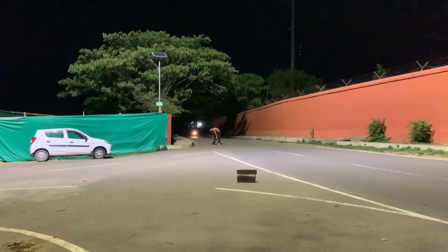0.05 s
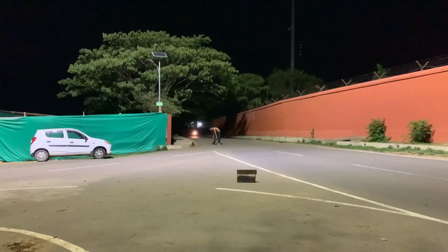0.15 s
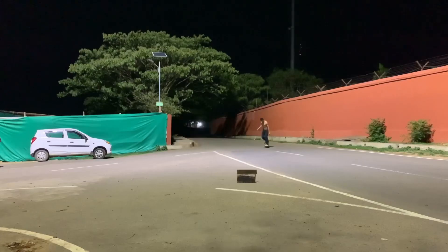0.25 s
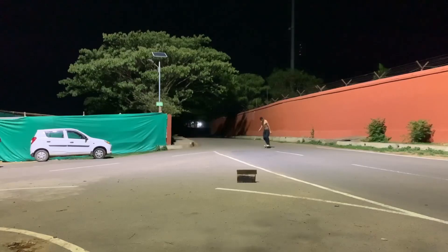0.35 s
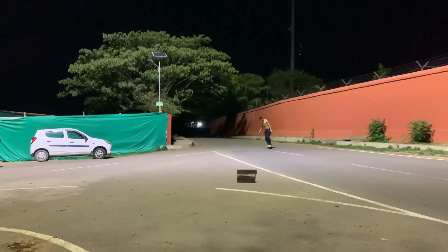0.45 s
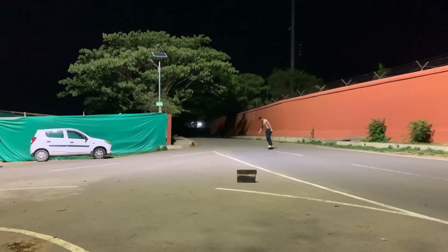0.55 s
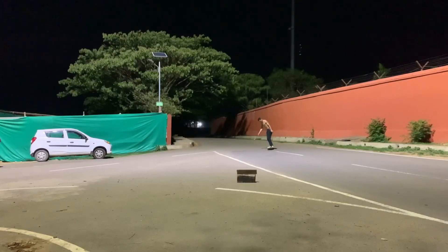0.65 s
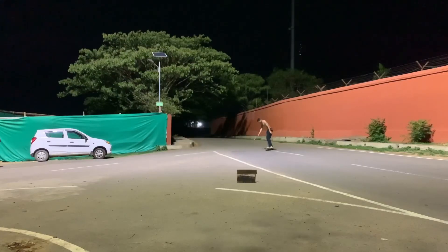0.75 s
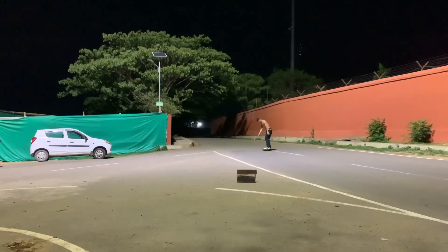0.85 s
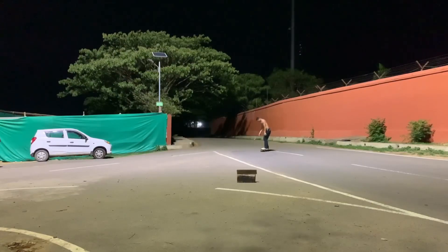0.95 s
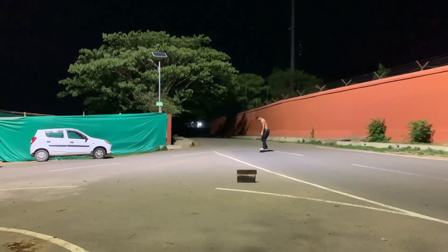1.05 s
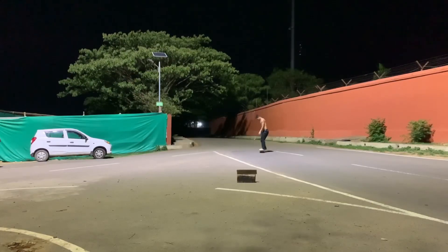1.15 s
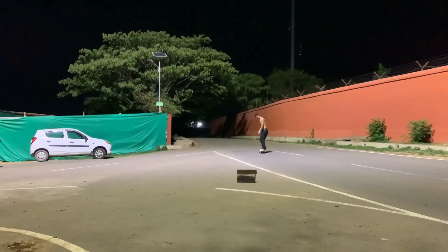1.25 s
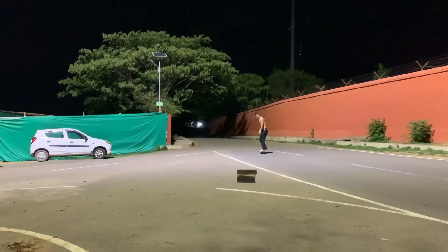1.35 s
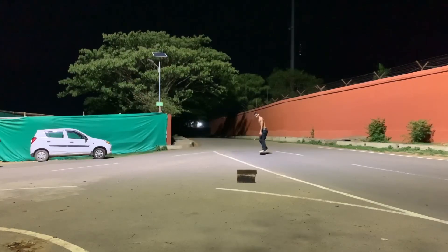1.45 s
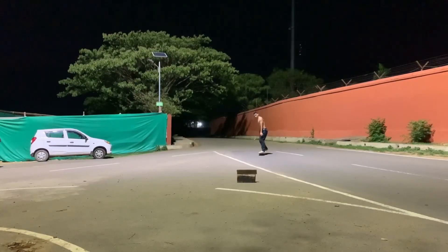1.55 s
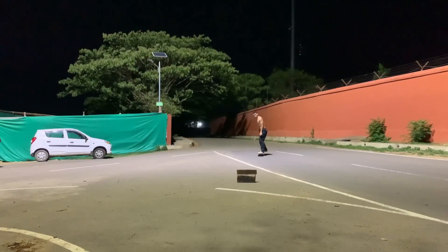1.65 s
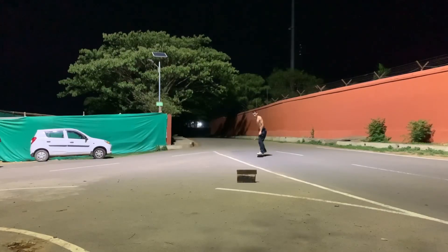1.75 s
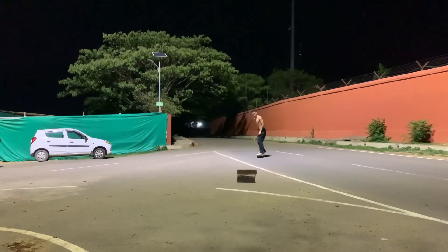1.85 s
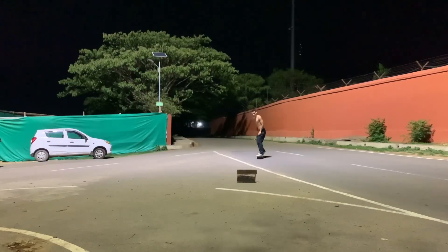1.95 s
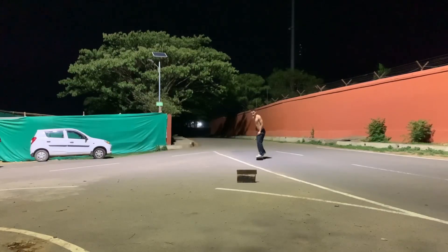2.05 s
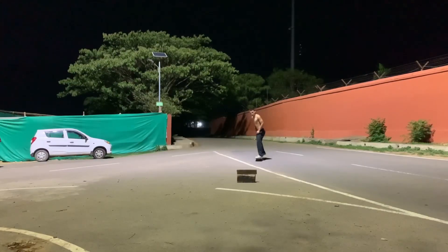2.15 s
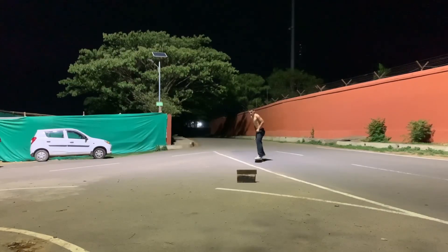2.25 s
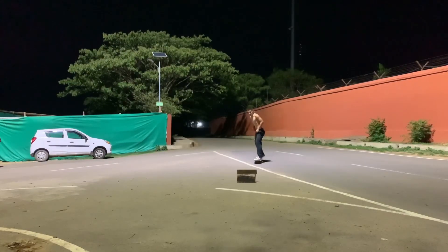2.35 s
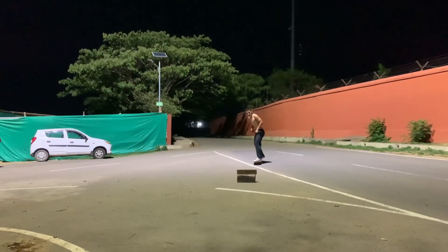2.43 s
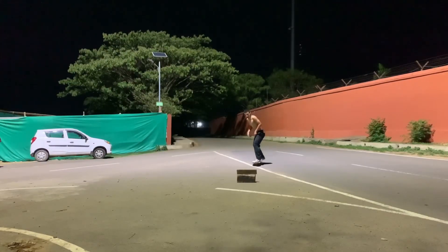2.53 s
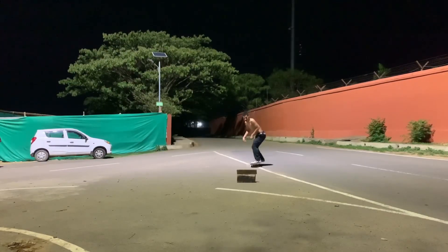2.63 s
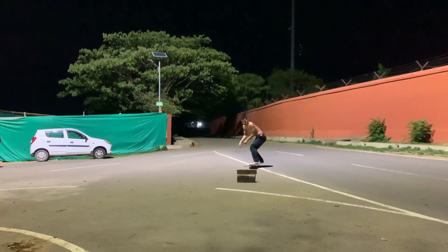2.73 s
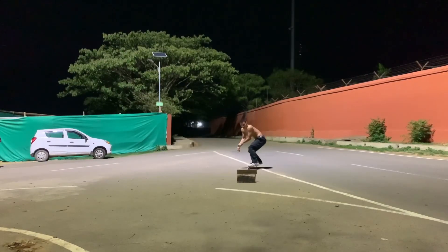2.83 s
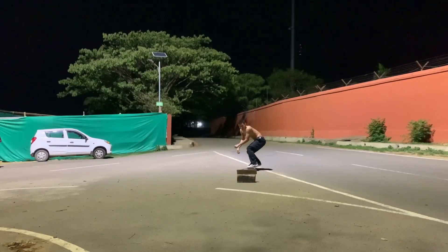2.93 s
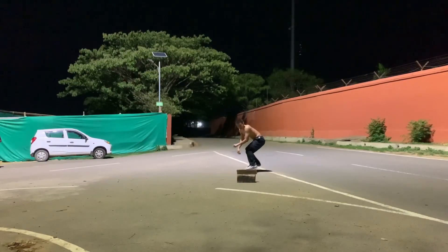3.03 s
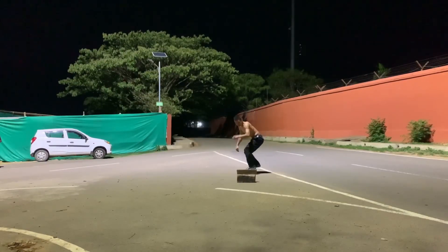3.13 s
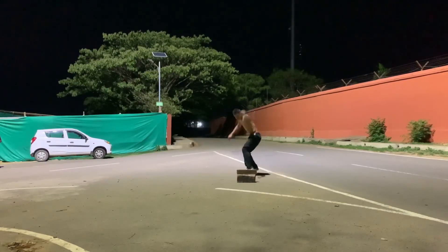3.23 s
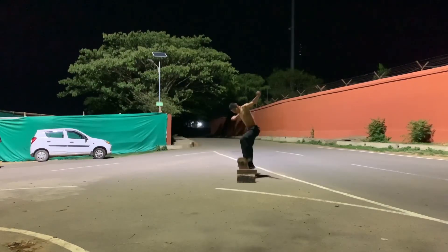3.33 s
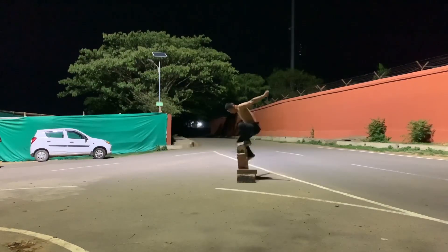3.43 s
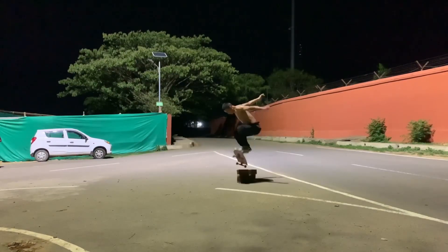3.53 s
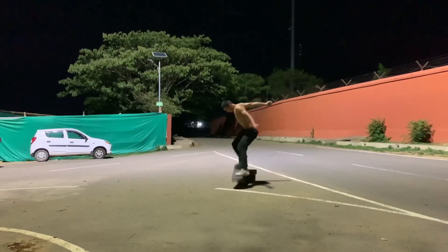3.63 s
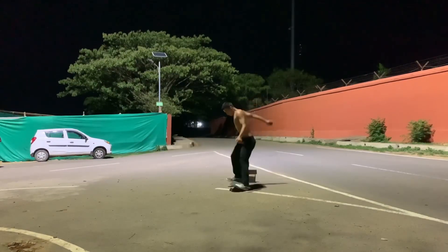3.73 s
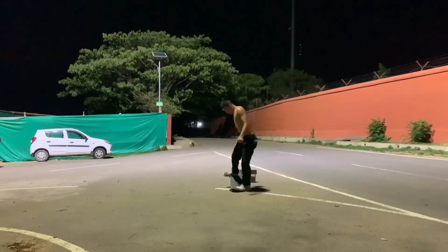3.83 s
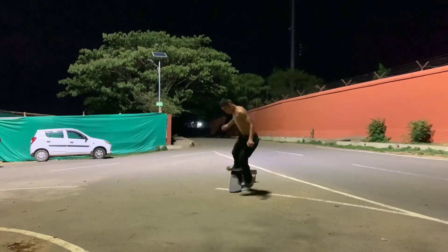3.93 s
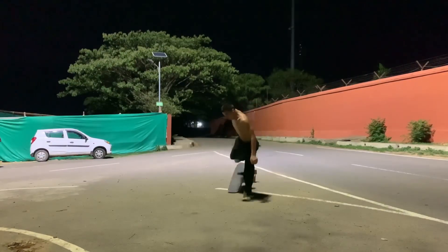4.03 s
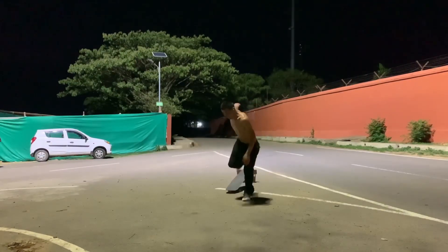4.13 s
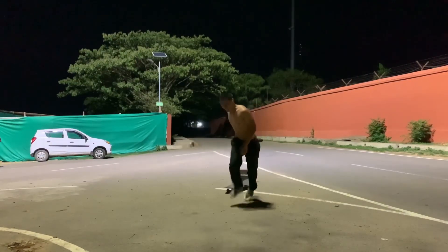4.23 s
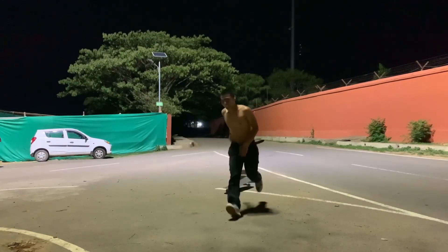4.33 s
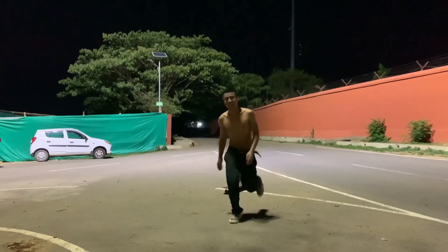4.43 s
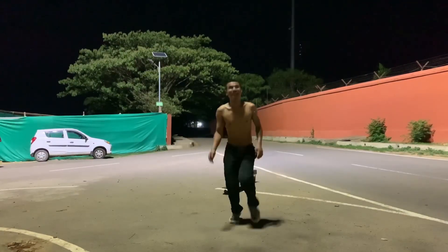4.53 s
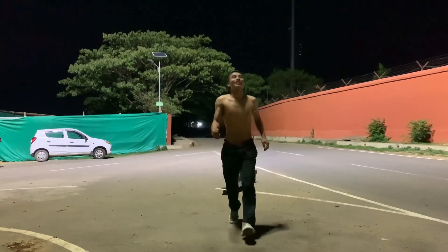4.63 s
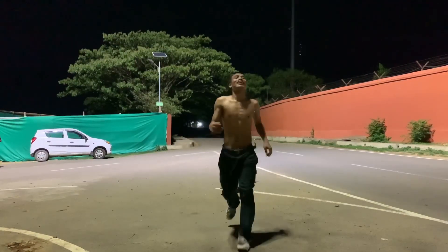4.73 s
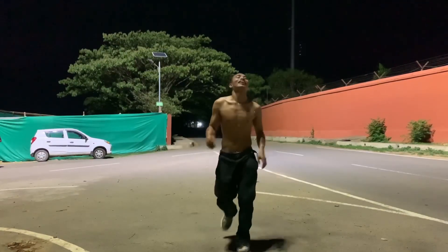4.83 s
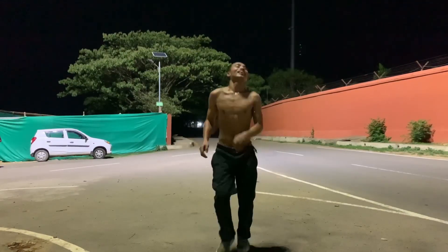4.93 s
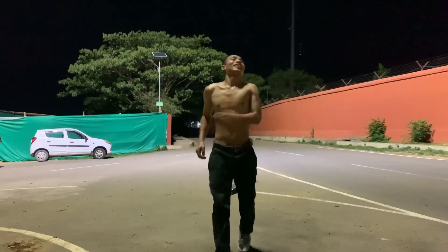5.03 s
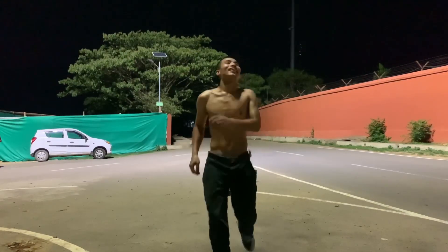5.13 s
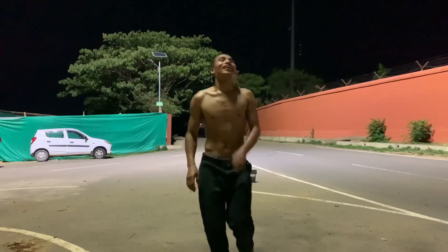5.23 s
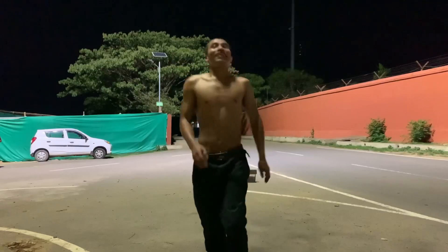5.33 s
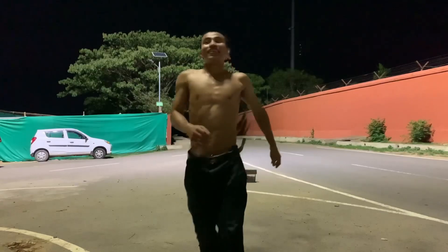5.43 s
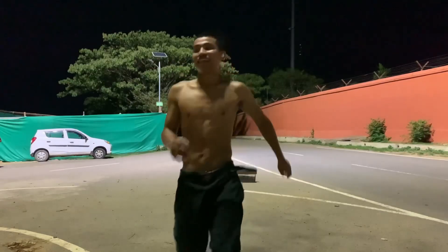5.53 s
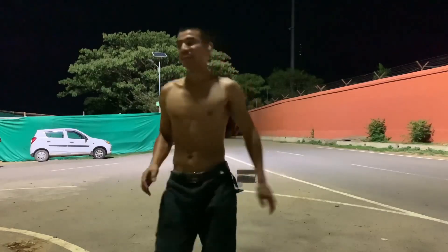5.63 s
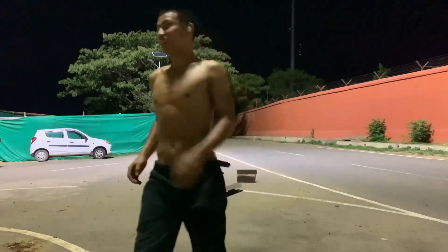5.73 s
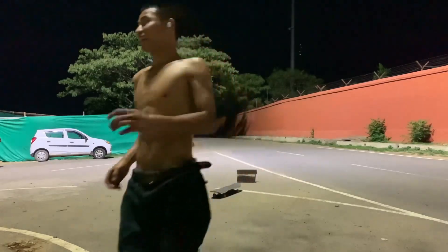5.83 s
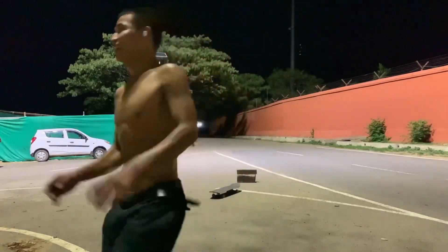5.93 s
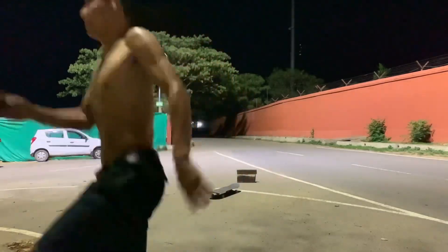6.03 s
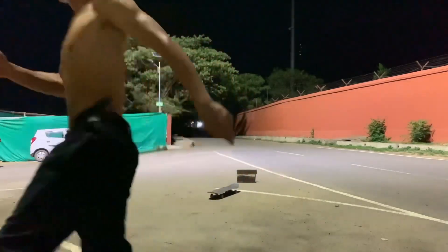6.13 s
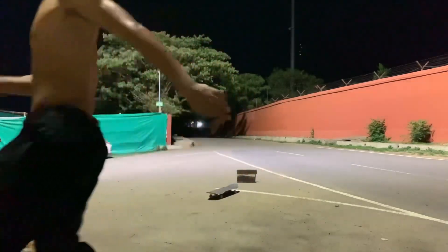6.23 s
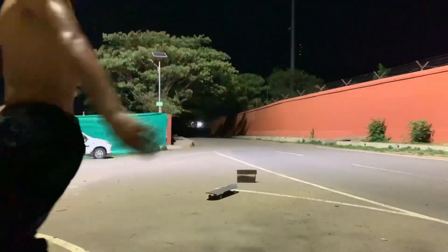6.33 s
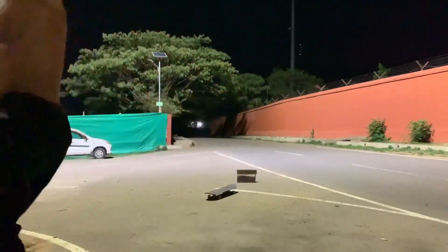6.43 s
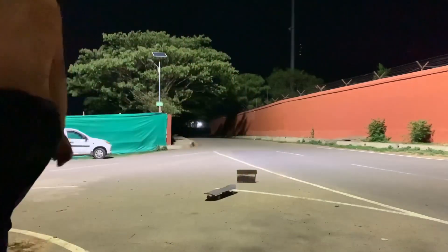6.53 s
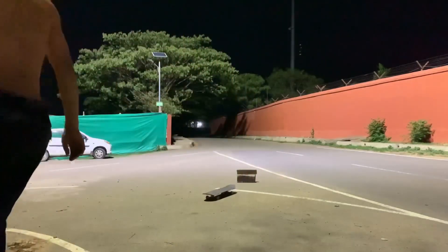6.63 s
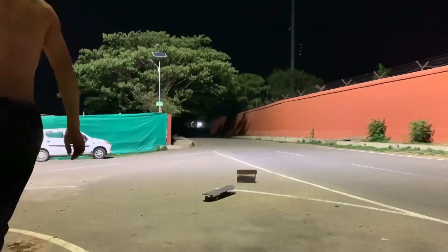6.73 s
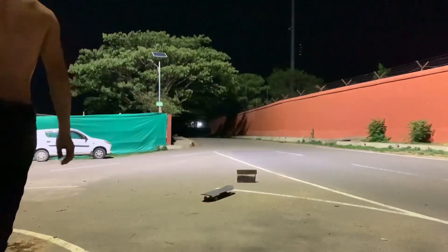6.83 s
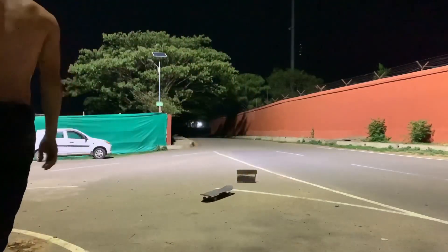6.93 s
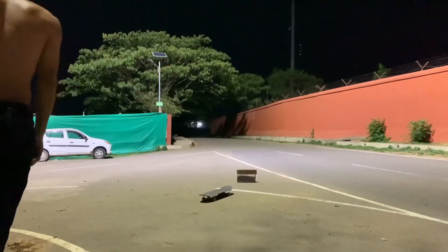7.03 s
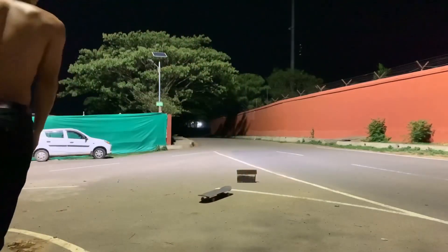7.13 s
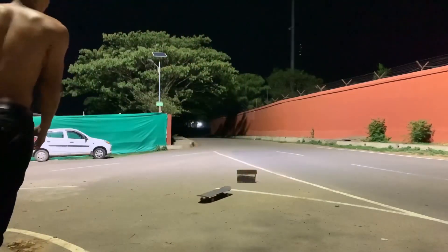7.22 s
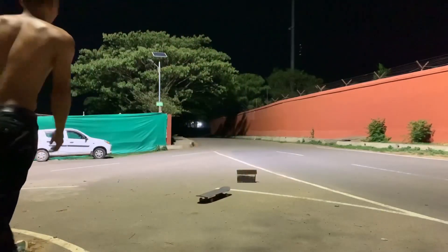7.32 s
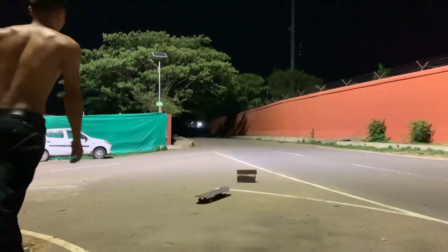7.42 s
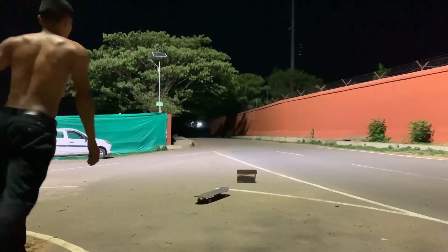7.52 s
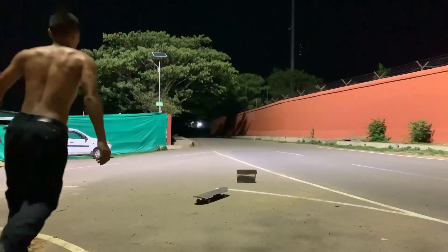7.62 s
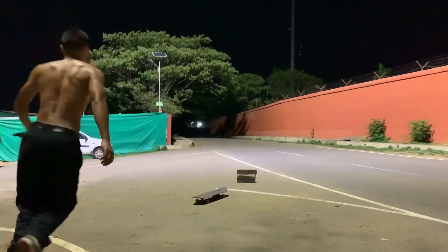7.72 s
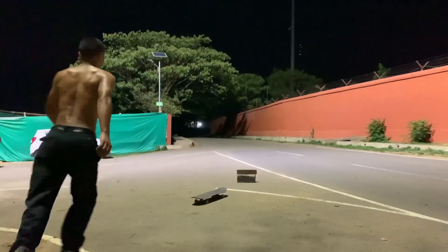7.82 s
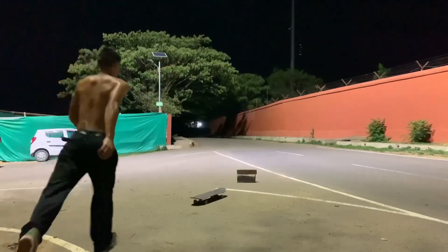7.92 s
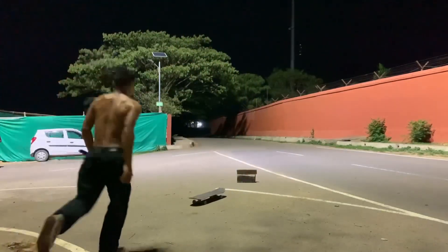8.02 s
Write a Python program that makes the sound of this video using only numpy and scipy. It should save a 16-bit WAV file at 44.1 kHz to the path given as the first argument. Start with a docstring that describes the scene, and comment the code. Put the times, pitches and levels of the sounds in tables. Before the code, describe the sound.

Skateboard wheels rumble over rough asphalt, a tail slap and loud clattering landing follow, while a single-cylinder motorcycle thumps away amid night insects.

```python
"""A walled car park at night: a skateboard rolls in over rough asphalt, pops over a low block, lands and clatters to
a stop, and the rider walks past with soft steps. Random stone impacts drive the wheels; knocks ring the wooden deck.
Beyond, a single-cylinder motorcycle thumps away and changes up once, each firing driving its exhaust note and rasp.
Insects trill as fuzzy high tones over filtered-noise traffic and a low town rumble. All sound drops out briefly
near the start."""
import sys
import numpy as np
from scipy import signal
from scipy.fft import rfft, irfft
from scipy.io import wavfile
from scipy.ndimage import uniform_filter1d

SR = 44100
rng = np.random.default_rng(int(sys.argv[2]) if len(sys.argv) > 2 else 0)


def log_audio(samples):
    """Write samples as a 16-bit WAV file to the path given in sys.argv[1]."""
    # one column per channel
    frames = np.atleast_2d(samples).T
    # limit to full scale, then quantise
    limited = np.clip(frames, -1, 1)
    pcm = np.round(limited * 32767).astype(np.int16)
    wavfile.write(sys.argv[1], SR, pcm)


N = 355975
T = np.arange(N) / SR  # time of every sample, s

# the board rolls in, its rolling starts to fade just before the tail slap, and it lands
START_S, ROLL_FADE_S, LAND_S = 0.245, 3.263, 3.75
# ticking of hard contacts and small dry clicks: [pitch_hz, level_db_per_hz]
TICK = [(2000, -5), (4000, -11), (5600, -5.5), (7500, -9.5), (10200, -2.5), (12000, -3.5), (14000, -4.5),
        (15300, -15), (16000, 5.5)]
# motorcycle throttle, shut for the gear change: [start_s, opening_0_to_1]
THROTTLE = [(0, 0.46), (0.9, 0.5), (1.4, 0.3), (1.7, 0.7), (2.5, 0.92), (3.0, 0), (3.65, 0), (4.1, 0.93),
            (8.07, 0.7)]
# sharp exhaust pops and tinny ring of the motorcycle: [start_s, pops_db, ring_db]
BITE = [(.26, -56, -50.5), (0.8, -54, -53), (1.4, -41.5, -54), (1.7, -34.5, -45.5), (1.88, -41.5, -50.5),
        (2.1, -38, -73), (2.45, -62, -79), (3.6, -57, -78), (4.65, -51.5, -59.5), (5.1, -51.5, -79),
        (5.8, -48.5, -68), (6.4, -56.5, -70), (6.7, -60.5, -70)]


def amp(db):
    """Decibels to gain."""
    return 10 ** (np.asarray(db) / 20)


def unit(x):
    """Scales to rms 1."""
    return x / np.sqrt(np.mean(x ** 2) + 1e-20)


def curve(rows, axis=1):
    """One column of a time table at every sample."""
    rows = np.array(rows)
    return np.interp(T, rows[:, 0], rows[:, axis])


def read(points, hz):
    """A spectrum table on a log-frequency axis."""
    f, value = np.transpose(points)
    return np.interp(np.log(hz + 1), np.log(f + 1), value)


def colour(x, points, size=4096):
    """Causal minimum-phase filter with the given spectrum."""
    hz = abs(np.fft.fftfreq(size, 1 / SR))
    log_gain = np.log(amp(np.maximum(read(points, hz), -100)))
    taps = np.fft.ifft(np.exp(np.conj(signal.hilbert(log_gain)))).real
    return signal.oaconvolve(x, taps[:size // 2])[:len(x)]


def wander(rate):
    """Slow random drift of rms 1, mostly below the given rate in Hz."""
    hz = np.fft.rfftfreq(2 ** 14, T[-1] / 2 ** 14)
    slow = irfft(rfft(rng.standard_normal(2 ** 14)) / (1 + (hz / rate) ** 4))
    return unit(np.interp(T, np.linspace(0, T[-1], len(slow)), slow))


def add(mix, s, sound):
    """Mixes a sound in at time s."""
    part = mix[round(s * SR):][:len(sound)]
    part += sound[:len(part)]


def patchy(x, depth_db):
    """The colour shifts at random from moment to moment; rms 1."""
    z = signal.stft(x, nperseg=512)[2]
    patches = uniform_filter1d(rng.standard_normal(z.shape), size=7, axis=0)
    patches = unit(uniform_filter1d(patches, size=8, axis=1))
    return unit(signal.istft(z * amp(depth_db * patches), nperseg=512)[1][:N])


def band(hz, width):
    """A fuzzy tone of rms 1 around a fixed or moving pitch."""
    turn = np.exp(2j * np.pi * np.cumsum(hz * np.ones(N)) / SR)
    envelope = wander(width / 2) + 1j * wander(width / 2)
    return unit((envelope * turn).real)


def impacts(per_s, spread_db):
    """Random small impacts whose sizes vary by chance; rms 1."""
    size = amp(spread_db * np.minimum(rng.exponential(1, N), 5))
    struck = rng.random(N) < per_s / SR
    return unit(size * rng.standard_normal(N) * struck)


def burst(points, decay, rise=0.0001, grain_db=3):
    """A grainy burst falling 60 dB in `decay` s, with the energy of 12 ms at rms 1."""
    t = np.arange(SR // 4) / SR
    grains = rng.standard_normal(len(t)) * amp(grain_db * np.minimum(rng.exponential(1, len(t)), 4))
    chatter = grains * amp(-60 * t / decay) * (1 - np.exp(-t / rise))
    return unit(colour(chatter, points)) * np.sqrt(0.012 * SR / len(t))


def wheels(rumble_db=-0.5, hiss_db=-3.0, bumpy_db=1.15, push_db=4, push_s=3.19, push_length=0.038,
           far_db=-5, near_db=2, edge_hz=680):
    """Stones in the asphalt shake the deck, under a crackling treble hiss; both share the rolling envelope."""
    # levels during the approach, before the trims; the hiss falls: [start_s, rumble_db, hiss_db]
    roll = [(0.3, -28.5, -36), (0.77, -33.5, -36), (0.86, -31.5, -41.5), (1.3, -34, -40),
            (1.75, -33, -38.5), (2.3, -32.5, -41.5), (2.6, -31.5, -43), (3.05, -33.5, -45.5),
            (3.26, -29.5, -43)]
    # wheels and deck shaken by the asphalt: [pitch_hz, level_db_per_hz]
    rumble_colour = [(50, -7), (80, -2.5), (140, -4), (214, -4), (363, -6.5), (428, 1), (476, -9),
                     (595, -3.5), (718, -11.5), (931, -12.5), (1100, -33.5), (1600, -36), (2600, -41)]
    # crackling treble hiss: [pitch_hz, level_db_per_hz]
    hiss_colour = [(710, -29), (1200, 0.5), (1610, -14), (1750, -3.5), (2020, -11.5), (2920, -3),
                   (3590, -9), (4860, -6), (8080, -6), (9110, -1), (10500, -2.5), (11700, 0.5),
                   (13300, -4.5), (16000, -7)]
    fade_db_per_s, landed_db, slowing_db_per_s = 51, -6.5, 31
    fading_db = -fade_db_per_s * np.maximum(T - ROLL_FADE_S, 0)
    slowing_db = landed_db - slowing_db_per_s * (T - LAND_S)
    contact_db = np.where(T < LAND_S, fading_db, slowing_db)
    rolling = (T > START_S) * amp(contact_db + bumpy_db * wander(57))
    push = amp(push_db * np.exp(-((T - push_s) / push_length) ** 2))  # the rider presses down before the jump

    shake = unit(colour(impacts(per_s=2500, spread_db=1.5), rumble_colour))
    low = signal.sosfiltfilt(signal.butter(4, edge_hz, fs=SR, output="sos"), shake)
    nearness_db = np.interp(T, [START_S, ROLL_FADE_S], [far_db, near_db])
    shake = low + (shake - low) * amp(nearness_db)  # brighter as it nears
    rumble = shake * amp(curve(roll) + rumble_db) * push

    crackle = impacts(per_s=5000, spread_db=3) + 0.82 * rng.standard_normal(N)
    hiss = patchy(colour(crackle, hiss_colour), depth_db=2.0)
    hiss = hiss * amp(curve(roll, axis=2) + hiss_db)
    return rolling * (rumble + hiss)


def knocks(rows, crack_colour, body_db=-4, crack_db=3, tick_db=3, off_centre_db_per_octave=7):
    """Each row is a short chatter: deck resonances ring under a noisy crack and a bright tick."""
    # resonances of the wooden deck: [pitch_hz, level_db, t60_s]
    deck = [(177, 2.5, 0.13), (280, 4.5, 0.043), (403, -5, 0.047), (443, 5, 0.056), (506, -6.5, 0.049),
            (550, 0, 0.036), (633, 5, 0.058), (683, -6, 0.024), (780, -2.5, 0.053), (870, 1, 0.042),
            (963, -5, 0.07), (1053, -11, 0.096), (1480, -12, 0.051), (1523, -12, 0.11), (2060, -21, 0.09),
            (2470, -17, 0.069), (2990, -9, 0.07)]
    out, t = np.zeros(N), np.arange(SR // 4) / SR
    for s, body, crack, tick, decay, hardness, centre_hz in rows:
        ring = np.zeros(len(t))
        for hz, db, t60 in deck:
            phase = rng.uniform(0, 2 * np.pi)  # each blow lands on another spot
            mode_db = db - off_centre_db_per_octave * abs(np.log2(hz / centre_hz))
            ring += amp(mode_db - 60 * t / t60) * np.sin(2 * np.pi * hz * t + phase)
        ring = unit(ring * (1 - np.exp(-t / 0.002))) * np.sqrt(0.012 * SR / len(t))  # same energy as a burst
        wood = [(hz * hardness, db) for hz, db in crack_colour]  # a softer contact cracks lower
        blow = amp(body + body_db) * ring
        blow += amp(crack + crack_db) * burst(wood, decay)
        blow += amp(tick + tick_db) * burst(TICK, decay)
        add(out, s, blow)
    return out


def tail_slaps():
    """The tail of the deck slaps the asphalt for the jump, with a dry wooden crack."""
    # slaps, levels before the trims in knocks(); hardness scales the crack's pitch, the deck rings most at centre:
    # [start_s, body_db, crack_db, tick_db, decay_s, hardness_factor, centre_hz]
    slaps = [(3.396, -25.5, -34, -38, 0.026, 1, 450), (3.404, -19, -33.5, -38, 0.035, 1, 443)]
    # dry crack of the wooden tail: [pitch_hz, level_db_per_hz]
    tail_crack = [(400, -12), (950, 5.5), (1500, 0), (1900, -3), (2600, 3), (3100, -4), (3650, -2),
                  (4300, -21), (7000, -21)]
    return knocks(slaps, tail_crack)


def landing_clatter():
    """Hard knocks of wheels, trucks and deck, thickest around the landing, with two dull wall echoes."""
    # knocks, with the wall echoes at 3.803 and 3.830 s; levels before the trims in knocks():
    # [start_s, body_db, crack_db, tick_db, decay_s, hardness_factor, centre_hz]
    contacts = [(3.278, -52, -47, -29.5, 0.011, 2.8, 550), (3.631, -38, -52.5, -40, 0.13, 1.14, 800),
                (3.711, -21, -31, -14, 0.089, 0.93, 650), (3.715, -11.5, -24.5, -19, 0.044, 1.06, 450),
                (3.720, -6.5, -28, -32, 0.031, 0.79, 800), (3.742, -31, -25, -13.5, 0.04, 1.05, 754),
                (3.745, -10.5, -26.5, -24, 0.04, 0.94, 680), (3.756, -19, -29, -44, 0.09, 0.34, 600),
                (3.766, -15, -25, -27, 0.027, 0.58, 845), (3.778, -36, -30.5, -40, 0.11, 0.35, 900),
                (3.803, -31, -43, -33, 0.058, 0.3, 700), (3.830, -21, -39, -50, 0.12, 0.33, 700),
                (3.967, -32, -41, -34.5, 0.022, 10, 567), (4.053, -37, -47.5, -35.5, 0.046, 1.6, 596),
                (4.066, -33, -41.5, -41, 0.019, 0.98, 800), (4.277, -26, -35, -26, 0.064, 0.94, 670),
                (4.301, -39, -43, -40, 0.071, 0.72, 1000), (4.463, -32, -48, -33.5, 0.11, 1.04, 760)]
    # hard contact of wheels and trucks: [pitch_hz, level_db_per_hz]
    hard_crack = [(500, -18.5), (900, -2), (1200, -2), (1450, 4.5), (1850, -1), (2050, -1), (2250, 7),
                  (2520, 5), (2900, 2), (3200, 2), (3700, -2), (4250, -23), (7000, -22.5)]
    return knocks(contacts, hard_crack)


def skids(width_hz=420):
    """Wheels and tail skid sideways: brief stick and slip whose pitch glides as the board twists."""
    # skids: [start_s, length_s, level_db, start_hz, end_hz]
    slides = [(3.404, 0.03, -42, 1410, 950), (3.765, 0.0225, -25.5, 1653, 800),
              (4.292, 0.035, -38, 754, 1270)]
    out = np.zeros(N)
    for s, length, db, start_hz, end_hz in slides:
        along = np.clip((T - s) / length, 0, 1)
        swell = np.sin(np.pi * along ** 0.91)
        out += amp(db) * swell * band(start_hz + (end_hz - start_hz) * along, width_hz)
    return out


def rattle(per_s=600, rattle_db=-52, hold_s=4.6, fade_db_per_s=90, jolt_db=-36, jolt_db_per_s=95):
    """Loose grit and hardware buzz at the landing and tick on until the board settles."""
    settling = amp(rattle_db - fade_db_per_s * np.maximum(T - hold_s, 0))
    jolt = amp(jolt_db - jolt_db_per_s * np.maximum(T - LAND_S, 0))
    ticking = unit(colour(impacts(per_s, spread_db=-10.0), TICK))
    return (T > LAND_S) * (settling + jolt) * ticking


def dry_clicks():
    """A few small dry clicks stand alone, each a short bright burst."""
    # single clicks; the last three fall on motorcycle firings: [start_s, level_db, decay_s]
    clicks = [(4.092, -47, 0.01), (4.163, -44, 0.014), (4.218, -43, 0.01), (4.255, -43, 0.008),
              (4.357, -44, 0.008), (4.386, -33.5, 0.034), (5.793, -39, 0.06), (7.526, -49, 0.013),
              (7.572, -52, 0.014)]
    out = np.zeros(N)
    for s, db, decay in clicks:
        add(out, s, amp(db) * burst(TICK, decay))
    return out


def spinning():
    """Free wheels hum through the deck during the jump: one slightly unsteady tone that swells and fades."""
    pitch_hz, level_db, loudest_s, spread_s = 430, -39.5, 3.56, 0.12
    swell = np.exp(-((T - loudest_s) / spread_s) ** 2)
    return amp(level_db) * swell * np.sin(2 * np.pi * np.cumsum(pitch_hz + 6 * wander(15)) / SR)


def footfalls(weight_lag_s=0.0038, thud_decay=0.028):
    """The sole slaps, then the weight comes down."""
    # footfalls, the first as the rider jumps off: [start_s, thud_db, slap_db, slap_decay_s]
    steps = [(4.413, -26, -26.5, 0.012), (5.151, -35, -52.5, 0.03), (6.15, -37.5, -42.5, 0.083),
             (8.036, -36, -58, 0.065)]
    # flat of a shoe hitting the ground: [pitch_hz, level_db_per_hz]
    slap_colour = [(500, -5), (1100, -8), (1450, 6.5), (1950, -5), (2500, 6.5), (3300, 2), (4500, -1),
                   (6500, -4), (8000, -5), (12000, -7), (13500, -16), (16000, -8)]
    # weight behind the step: [pitch_hz, level_db_per_hz]
    thud_colour = [(100, 3), (200, -2), (450, 4.5), (700, -3.5), (1100, -16), (3000, -35)]
    out = np.zeros(N)
    for s, thud_db, slap_db, decay in steps:
        add(out, s, amp(slap_db) * burst(slap_colour, decay, rise=0.00082))
        add(out, s + weight_lag_s, amp(thud_db) * burst(thud_colour, thud_decay))
    return out


def shoes():
    """Soles drag briefly over loose grit."""
    # scuffs: [start_s, level_db, length_s]
    scuffs = [(4.39, -37, 0.03), (4.475, -41, 0.059), (5.124, -42.5, 0.042), (5.477, -43.5, 0.055),
              (5.587, -47.5, 0.066), (5.795, -44, 0.033), (6.092, -47, 0.032), (8.024, -53, 0.023)]
    # rubber sole on asphalt: [pitch_hz, level_db_per_hz]
    sole_colour = [(200, 17.5), (700, -2), (1200, -11), (1800, 6), (2500, -9), (4000, -11), (14000, -21)]
    drag = sum(amp(db) * np.sin(np.pi * np.clip((T - s) / length, 0, 1)) for s, db, length in scuffs)
    grains = impacts(per_s=4000, spread_db=2)
    return drag * unit(colour(grains, sole_colour))


def yard(x, wet_db=-14, wall_db=-17, wall_s=0.1):
    """Car park echo: a dull slap from the long wall and a thin diffuse tail of decaying noise."""
    # reverberation of the car park: [pitch_hz, t60_s]
    yard_t60 = [(150, 1), (600, 0.52), (2000, 0.43), (6000, 0.53), (15000, 0.23)]
    hz, t, z = signal.stft(rng.standard_normal(SR), SR, nperseg=256)
    tail = signal.istft(z * amp(-60 * t / read(yard_t60, hz)[:, None]), SR, nperseg=256)[1]
    tail = tail * np.minimum(np.arange(len(tail)) / SR / 0.0018, 1)
    out = x + amp(wet_db) * signal.fftconvolve(x, tail / np.linalg.norm(tail))[:N]
    wall = colour(x, [(200, -4), (450, -1), (950, 0.5), (1400, -15), (4000, -25), (15000, -16)])
    add(out, wall_s, amp(wall_db) * wall)
    return out


def motorcycle(uneven_db=3.0, note_db=0, pipe_db=-1):
    """Every firing drives the exhaust note, rings the pipe and lets out a puff."""
    # firing rate: it pulls, changes up near 3 s, and pulls again: [start_s, firings_per_s]
    firing_rate = [(0.25, 18.09), (1.35, 19.49), (2.6, 19.88), (3.05, 18.06), (3.55, 18.48), (3.85, 17.59),
                   (4.9, 18.33), (6.2, 19.85), (7.0, 21.61), (8.07, 22.68)]
    # exhaust pipe resonances: [pitch_hz, width_hz, level_db]
    pipe_modes = [(40.2, 87, -10), (123.3, 6.1, 8), (301, 21, 0), (460, 48, -12)]
    running = T > 0.255
    rate = curve(firing_rate)
    turns = np.cumsum(rate * running) / SR  # firings so far
    firings = np.diff(np.ceil(turns), prepend=0) * amp(uneven_db * wander(58))
    t = np.arange(SR // 3) / SR
    pipe = np.zeros(len(t))
    for hz, width, db in pipe_modes:
        pipe += amp(db) * width * np.exp(-np.pi * width * t) * np.cos(2 * np.pi * hz * t)
    thump = signal.oaconvolve(firings, pipe)[:N]
    thump = colour(thump, [(22, -30), (40, -2.5), (450, -1), (900, -37.0), (1500, -33), (4000, -77)])
    boom = amp(note_db) * exhaust_note(turns, rate) + amp(pipe_db) * unit(thump) * note_level()
    return running * (boom + exhaust_rasp(turns) + tinny_ring(turns))


def throttle_shut():
    """How far the throttle is closed, 0 to 1."""
    return 1 - np.clip(curve(THROTTLE), 0, 1)


def note_level(waver_db=1.5):
    """Gain of the exhaust as the motorcycle rides away, changed a little by the throttle."""
    note_db, doubling_s, shut_db = -38, 1.43, 2  # distance has doubled after doubling_s
    return amp(note_db + shut_db * throttle_shut() + waver_db * wander(4.0)) / (1 + T / doubling_s)


def exhaust_note(turns, rate, overrun_db=16, overrun_hz=147, smear=0.1):
    """The low drone: three strong harmonics of the firing rate that swell in turn, and weaker ones around them."""
    # three strongest harmonics: [start_s, fifth_db, sixth_db, seventh_db]
    drone = [(0.3, -51, -29, -26), (0.52, -26, -52, -48), (0.72, -27, -43, -43), (1.0, -29, -27.5, -28.5),
             (1.45, -41, -63, -39), (1.85, -35, -45, -33.5), (2.35, -31, -60, -52), (2.75, -42, -35.5, -54),
             (3.5, -47, -56, -75), (3.9, -44, -41.5, -49), (4.35, -34.5, -45.5, -43.5),
             (5.4, -37.5, -55, -42), (5.75, -43, -44.5, -46.5), (6.2, -39.5, -53, -44),
             (6.42, -53, -56, -59), (6.6, -37.5, -42.5, -53), (6.9, -36.5, -51, -46),
             (7.08, -47, -54, -53.5), (7.27, -39, -36.5, -63), (7.55, -41, -44.5, -49),
             (7.78, -55.5, -40.5, -51), (8.05, -41, -47, -60)]
    # weaker harmonics, before the note level: [multiple_of_firing_rate, level_db]
    weak_orders = [(2, 1), (3, -7), (4, 0), (8, -9.5), (9, -7.5), (10, -7.5), (12, -12), (13, -5),
                   (14, -10.5), (15, -9), (16, -25), (17, -38)]
    shut, weak = throttle_shut(), np.zeros(N)

    def harmonic(order):
        """The silencer delays the higher orders, so each beat is drawn out."""
        return np.sqrt(2) * np.cos(2 * np.pi * (order * turns - smear * order ** 2 / 2))

    for order, db in weak_orders:
        # with the throttle shut a higher drone stands out
        drone_db = shut * overrun_db * np.exp(-((order * rate - overrun_hz) / 12) ** 2)
        weak += amp(db + drone_db + 2 * wander(1.0)) * harmonic(order)
    strong = sum(amp(curve(drone, axis=k + 1)) * harmonic(order) for k, order in enumerate((5, 6, 7)))
    return strong + weak * note_level()


def exhaust_rasp(turns, puff_turns=0.1, crank_share=0.35, wash=0.095):
    """A puff of gas and a sharp pop at every firing, and a faint rattle on the crank turn between."""
    # exhaust rasp: [pitch_hz, level_db_per_hz]
    rasp_colour = [(200, -5), (500, 5.5), (1000, 6.5), (1600, -9), (2450, 9), (3700, -2), (5200, 1.5),
                   (7500, -3), (11000, 8), (16000, -11)]
    # exhaust pop: [pitch_hz, level_db_per_hz]
    pop_colour = [(120, -3), (300, 5.5), (700, -0.5), (1150, -9.5), (1800, -22), (2500, -10.5),
                  (3500, -20.5), (4800, -12), (5800, -18.5), (7200, -16), (9000, -18), (12500, -18),
                  (16000, -28)]
    # the rasp fades until the motorcycle is far off, and drops while the throttle is shut
    start_db, recede_db_per_s, far_s, shut_db = -34.5, 6, 6.6, -15
    puff = np.exp(-(turns % 1) / puff_turns)
    crank = crank_share * np.exp(-((turns + 0.5) % 1) / puff_turns)
    gate = puff + crank + wash
    rasp = patchy(colour(rng.standard_normal(N) * gate, rasp_colour), depth_db=2.5)
    snap = np.exp(-(turns % 1) / 0.065) * amp(1.5 * wander(20))
    pops = patchy(colour(rng.standard_normal(N) * snap, pop_colour), depth_db=2.5)
    rasp_db = start_db - recede_db_per_s * np.minimum(T, far_s) + shut_db * throttle_shut() ** 2
    return rasp * amp(rasp_db) + pops * amp(curve(BITE))


def tinny_ring(turns, ring_turns=0.19, width_hz=520, upper_ratio=2.02, upper_db=-3, drift_hz=110):
    """Two metallic resonances, struck at every firing, that drift in pitch."""
    # lower resonance, before its random drift: [start_s, pitch_hz]
    ring_pitch = [(0.3, 2850), (0.9, 2725), (1.5, 2443), (1.9, 2253), (4.6, 2466), (5.1, 2156), (6.1, 2690),
                  (8.07, 2806)]
    struck = np.exp(-(turns % 1) / ring_turns) * np.minimum((turns % 1) / 0.05, 1)
    hz = curve(ring_pitch) + drift_hz * wander(9)
    metal = band(hz, width_hz) + amp(upper_db) * band(hz * upper_ratio, width_hz * upper_ratio)
    return unit(struck * metal) * amp(curve(BITE, axis=2))


def insects(chirp_turns=0.15):
    """High trills, each a fuzzy tone, and one evenly chirping bush cricket of pulsed noise."""
    # trills: [pitch_hz, width_hz, level_db, end_s]
    trill_rows = [(10030, 240, -68.5, 7.05), (9700, 1000, -70, 7.05), (14600, 200, -74, 8.1),
                  (15250, 240, -65.5, 8.1), (15500, 700, -69, 8.1)]
    # bush cricket, before the pulsing: [start_s, level_db]
    chirp_level = [(0, -59), (5.4, -66), (6.25, -62), (6.8, -63), (7.2, -70), (8.07, -66)]
    # bush cricket: [pitch_hz, level_db_per_hz]
    chirp_colour = [(8000, -40), (10600, -12), (11450, 0), (12500, -5), (13500, -22), (16000, -35)]
    chirp_s, chirps_per_s = 6.68, 6.98  # time of one chirp, and the rate
    trills = np.zeros(N)
    for hz, width, db, until in trill_rows:
        trills += amp(db) * band(hz, width) * np.clip((until - T) / 0.016, 0, 1)
    off_beat = ((T - chirp_s) * chirps_per_s + 0.5) % 1 - 0.5
    pulses = np.exp(-(off_beat / chirp_turns) ** 2)
    chirps = pulses * unit(colour(rng.standard_normal(N), chirp_colour))
    return trills + chirps * amp(curve(chirp_level))


def night():
    """Distant traffic and hiss as filtered noise, and the low rumble of the town as a fuzzy tone."""
    # distant traffic and hiss: [pitch_hz, level_db_per_hz]
    air_colour = [(20, -58), (30, -21), (48, -5), (70, -12), (110, 1.5), (200, -14.5), (290, -12),
                  (420, -15.5), (800, -22.5), (1480, -37), (2840, -37), (3700, -38), (5000, -38.5),
                  (7700, -43), (11500, -37), (13400, -42), (16000, -36)]
    # their level: [start_s, level_db]
    air_level = [(0.2, -47), (.3, -30), (3.2, -40), (3.55, -38.5), (4.5, -41), (8.07, -44.5)]
    town_hz, town_width_hz, town_db = 49, 20, -42.5
    air = unit(colour(rng.standard_normal(N), air_colour)) * amp(curve(air_level))
    return air + amp(town_db) * band(town_hz, town_width_hz)


def scene():
    """Knocks, skids, clicks and shoes echo in the yard; wheels, motorcycle, insects and night air stay dry."""
    board = tail_slaps() + landing_clatter() + skids() + rattle() + spinning()
    echoing = yard(board + dry_clicks() + footfalls() + shoes())
    return (echoing + wheels() + motorcycle() + insects() + night())[None]


def record(dry):
    """The sound drops out briefly near the start; a bass cut, softly rounded peaks, then the band limit."""
    edge_hz = 15900
    live = np.interp(T, [0.191, 0.194, 0.24, 0.256], [1, 0, 0, 1])
    cut = signal.sosfilt(signal.butter(6, 33, "highpass", fs=SR, output="sos"), dry)
    lowpass = signal.firwin(511, edge_hz, window=("kaiser", 9), fs=SR)
    return signal.oaconvolve(np.tanh(cut * live), lowpass[None], "same")


dry = scene()
out = record(dry)
log_audio(out)
```